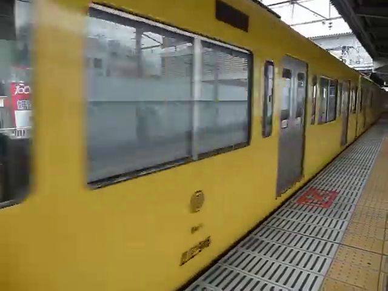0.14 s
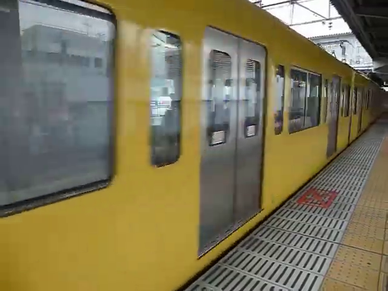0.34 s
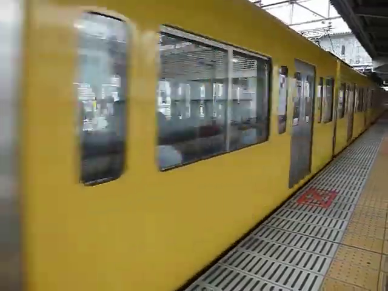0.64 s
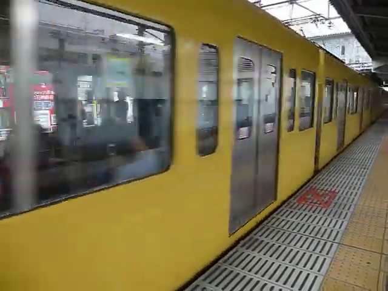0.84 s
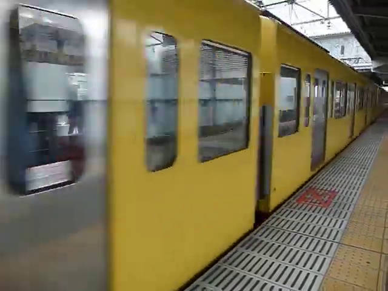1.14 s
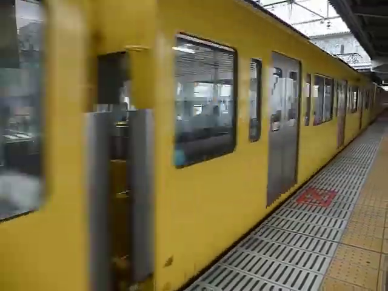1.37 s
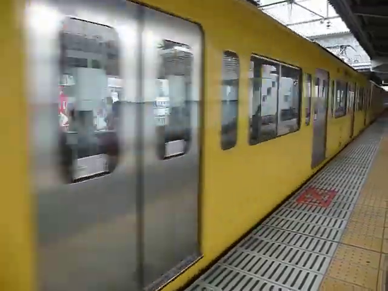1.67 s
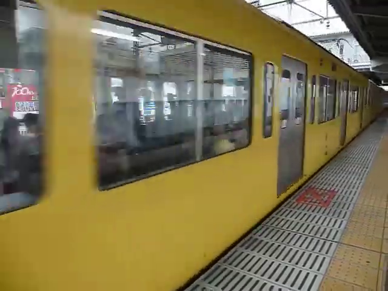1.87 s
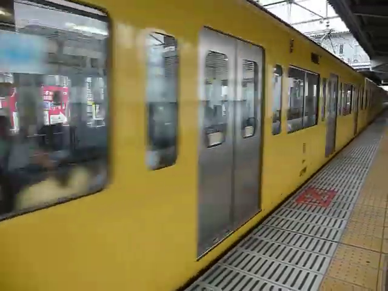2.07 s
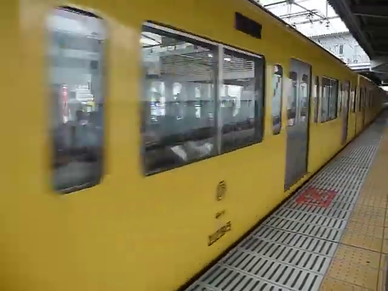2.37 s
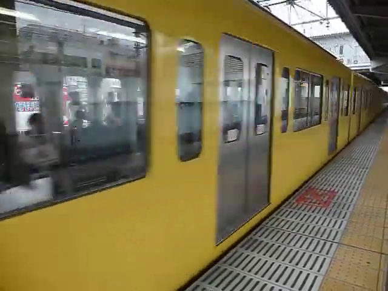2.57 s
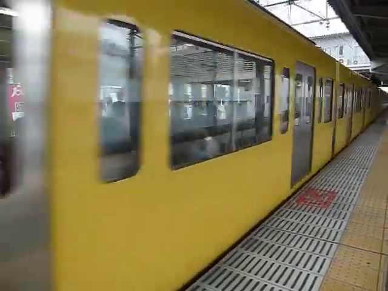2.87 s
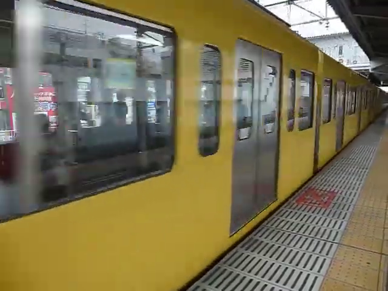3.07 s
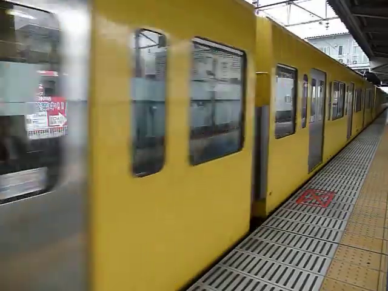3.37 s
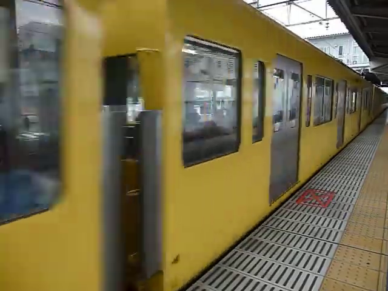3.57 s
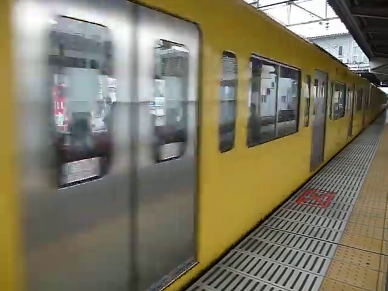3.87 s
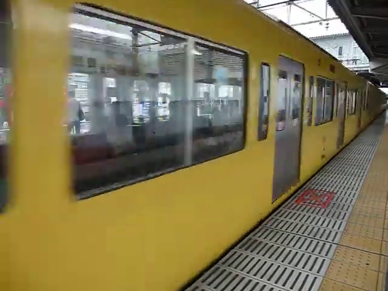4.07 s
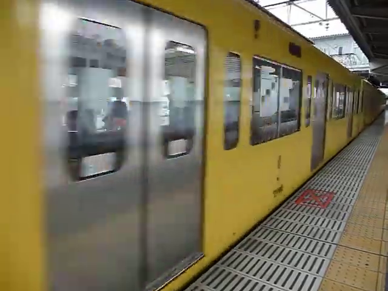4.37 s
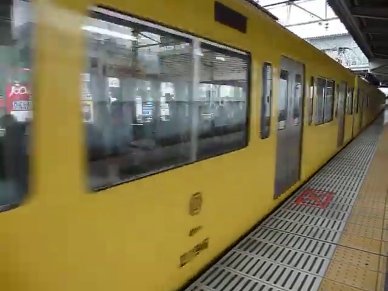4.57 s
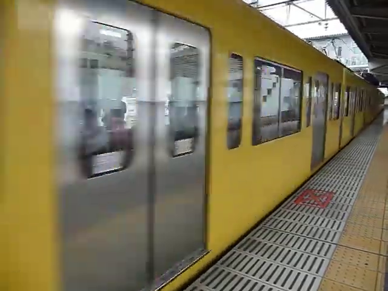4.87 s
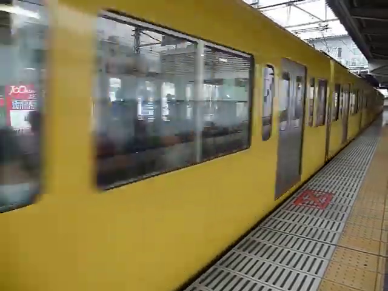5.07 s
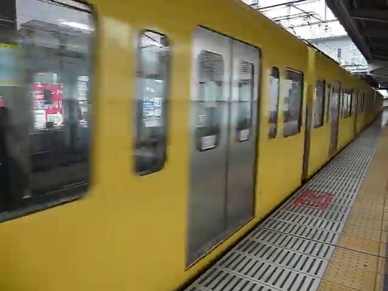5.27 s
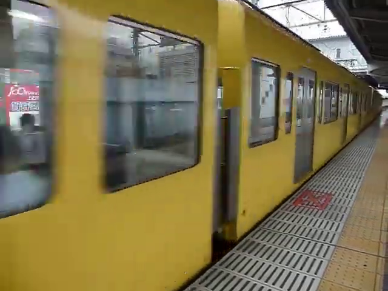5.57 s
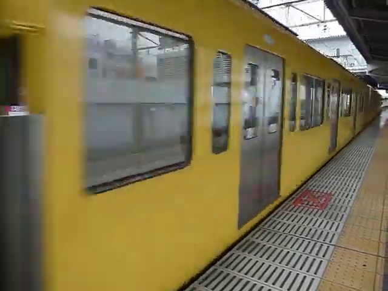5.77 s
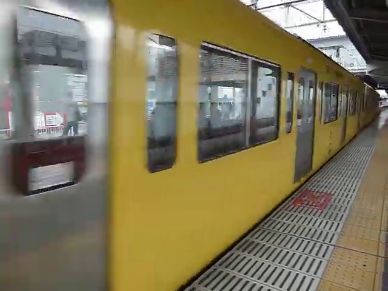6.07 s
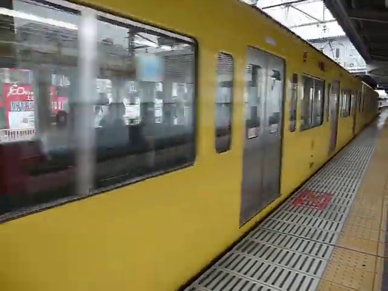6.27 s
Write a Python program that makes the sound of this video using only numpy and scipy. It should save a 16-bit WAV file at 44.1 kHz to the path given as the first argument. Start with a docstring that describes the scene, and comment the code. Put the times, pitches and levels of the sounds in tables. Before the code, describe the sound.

An electric commuter train gathers speed close past a roofed platform, motors humming unsteadily and gears whining while wheels roar and clack over rail joints.

```python
"""An electric commuter train gathers speed past a small camera on a roofed station platform.
At once a jet of air hisses out under the car (filtered noise) and the first bogie clacks over a joint.
Then motors hum and gears whine (wavering tones in beating pairs), climbing slowly in pitch, wheels roar,
steel rings, sings or scrapes (coloured noise), and joints clack or thud (noise bursts, short rings).
After about five seconds hum and whine sink away, leaving roar, draught and the last joints."""
import sys
import numpy as np
from scipy import signal
from scipy.fft import rfft, irfft
from scipy.io import wavfile
from scipy.ndimage import uniform_filter1d

SR = 44100
rng = np.random.default_rng(int(sys.argv[2]) if len(sys.argv) > 2 else 0)


def master_out(mix):
    """Clip the mix to full scale and print it as 16-bit PCM to the path in sys.argv[1]."""
    frames = np.transpose(np.atleast_2d(mix))
    ceiling = np.clip(frames, -1, 1)
    pcm = np.round(ceiling * 32767).astype(np.int16)
    wavfile.write(sys.argv[1], SR, pcm)


N = 284004
TIME = np.arange(N) / SR
FREQS = np.fft.rfftfreq(N, 1 / SR)

# how alike the two microphone ports hear a sound: [f/Hz, likeness 0 to 1]
PORT_LIKENESS = [(30, .6), (70, 1), (130, 1), (260, 1), (500, 1), (1000, 0.96), (1900, 0.92), (3600, 0.8),
                 (7000, 0.86)]
# phase by which the left port leads the right: [f/Hz, lead/rad]
PORT_LEAD = [(100, 0.048), (400, 0.11), (1000, 0.28), (2000, 0.84), (4000, 1), (7200, 0.46)]
# resonances of wheels and rail: [f/Hz, width/Hz, lift/dB]
STEEL_MODES = [(790, 220, 1.5), (940, 93, 0.5), (1830, 29, 4.5), (2070, 220, 4), (2353, 220, 6),
               (2770, 57, -4.5), (3005, 80, 3.5), (3910, 220, 1.5), (4700, 500, 1.5)]


def amp(db):
    """Decibels to gain."""
    return 10 ** (np.asarray(db) / 20)


def unit(x):
    """Scales to rms 1."""
    return x / np.sqrt(np.mean(abs(x) ** 2) + 1e-20)


def add(mix, s, sound):
    """Mixes a sound in at time s, cut off at the end of the mix."""
    part = mix[..., round(s * SR):][..., :sound.shape[-1]]
    part += sound[..., :part.shape[-1]]


def curve(rows, axis=1):
    """One column of a time table, interpolated at every sample."""
    rows = np.array(rows)
    return np.interp(TIME, rows[:, 0], rows[:, axis])


def read(points, hz):
    """A frequency table interpolated on a log-frequency axis."""
    f, value = np.transpose(points)
    return np.interp(np.log(hz + 1), np.log(f + 1), value)


def drift(rate_hz):
    """Smooth chance movement of rms 1, no faster than about rate_hz."""
    slow = rfft(rng.standard_normal(N)) * np.exp(-(FREQS / rate_hz) ** 2)
    return unit(irfft(slow, N))


def steadied(x, window_s):
    """Evens out the chance lumps of a sound, so that its strength is that of the force driving it."""
    size = int(window_s * SR)
    power = uniform_filter1d((x ** 2).mean(0), size=size)
    power = uniform_filter1d(power, size=size)
    return unit(x / np.sqrt(abs(power) + 1e-9))


def noise(colour, lift_db=0):
    """Coloured noise at the two ports, which agree less at some pitches and hear it out of phase."""
    a, b = rfft(rng.standard_normal((2, N)))
    same = np.clip(read(PORT_LIKENESS, FREQS), 0, 1)
    right = same * a + np.sqrt(1 - same ** 2) * b
    right = right * np.exp(-1j * read(PORT_LEAD, FREQS))
    spectrum = np.array([a, right]) * amp(read(colour, FREQS) + lift_db)
    return unit(irfft(spectrum, N))


def tone(hz, scatter, spread_hz):
    """A direct line plus its Doppler-smeared reflections, which differ a little between the ports."""
    near, apart = (unit(drift(spread_hz) + 1j * drift(spread_hz)) for _ in range(2))
    same = np.clip(read(PORT_LIKENESS, hz.mean()), 0, 1)
    echoes = np.array([near, same * near + np.sqrt(1 - same ** 2) * apart])
    phase = 2 * np.pi * (np.cumsum(hz) / SR + rng.random())
    phases = np.array([phase, phase - read(PORT_LEAD, hz)])
    return unit(((1 + scatter * echoes) * np.exp(1j * phases)).real)


def steel():
    """The lift in dB that ringing wheels and rail give each frequency."""
    return sum(db / (1 + (2 * (FREQS - hz) / width) ** 2) for hz, width, db in STEEL_MODES)


def draught():
    """Air dragged along by the train buffets each port on its own, as low unrelated noise."""
    # spectrum of the eddies: [f/Hz, relative level/dB]
    eddy_colour = [(15, -32), (35, -8.5), (65, 4), (110, 7), (170, 0.5), (260, -11.5), (500, -28.5)]
    # strength of the draught: [t/s, level/dB]
    strength = [(0, -58.5), (1, -44), (2.3, -42), (3.2, -43), (4.8, -55), (6.44, -42)]
    eddies = irfft(rfft(rng.standard_normal((2, N))) * amp(read(eddy_colour, FREQS)), N)
    return amp(curve(strength) + 3.4 * drift(7.8)) * unit(eddies)


def air_jet():
    """Compressed air hisses briefly under the car: the valve opens, holds and shuts."""
    # the jet: [start t/s, length/s from start to shutting, level/dB]
    jet = (-.02, 0.31, -42)
    # spectrum of the jet: [f/Hz, relative level/dB]
    jet_colour = [(1500, -12), (3500, -10), (5500, 1), (7000, -3), (7700, -13)]
    rise_s, t60_s = 0.069, 0.25
    start, length, db = jet
    opening = np.clip((TIME - start) / rise_s, 0, 1)
    shut = np.maximum(TIME - start - length, 0)
    dying = np.exp(-np.log(1000) * shut / t60_s)
    return amp(db) * opening * dying * noise(jet_colour)


def rolling():
    """Rough wheel treads shake car bodies, rails and wheels; one unevenness moves roar and hiss."""
    # level of the rolling noise: [t/s, rumble/dB, roar/dB, hiss/dB]
    levels = [(0, -26, -24, -34), (.8, -23.5, -24.5, -37), (1.05, -27, -25, -38), (1.3, -23.5, -24.5, -38),
              (1.55, -28.5, -25, -37), (1.85, -31, -24.5, -37.5), (2.05, -29.5, -25, -37),
              (2.18, -24, -22, -35), (2.36, -22.5, -23.5, -34.5), (2.6, -25, -26, -37.5),
              (3.3, -27.5, -23, -34.5), (3.95, -28.5, -23.5, -35), (4.3, -25.5, -22.5, -35),
              (4.52, -27, -24, -36.5), (5.2, -25, -21.5, -35), (5.7, -28, -24, -37),
              (5.88, -23.5, -21, -35), (6.18, -28, -23.5, -35.5), (6.44, -25, -21.5, -34)]
    # spectra from low to high: [f/Hz, relative level/dB]
    rumble_colour = [(20, -29), (40, -13), (70, -12), (100, -7.5), (160, -1), (230, 0), (300, 4.5),
                     (420, -31.5), (800, -49)]
    roar_colour = [(150, -30.5), (280, -1), (360, 2.5), (470, -0.5), (660, -10.5), (900, -11),
                   (1120, -13.5), (1320, -20.5), (1700, -24.5), (2600, -45)]
    hiss_colour = [(700, -26.5), (1400, 8), (2100, 5.5), (2750, 5), (3500, 2.5), (4800, -0.5), (6100, -3),
                   (7000, -7.5), (7700, -44.5)]
    uneven = drift(8.9)
    rumble = amp(curve(levels) + 1.5 * drift(5.0)) * noise(rumble_colour)
    roar = amp(curve(levels, axis=2) + 1.2 * uneven) * noise(roar_colour, steel())
    hiss = amp(curve(levels, axis=3) + 0.49 * uneven) * noise(hiss_colour, steel())
    return rumble + roar + hiss


def high_steel():
    """High steel sounds: wheels ring after joint blows, and flanges sing or scrape between them."""
    # swells of band-filtered noise, singing when narrow and scraping when wide:
    # [middle t/s, half length/s, centre f/Hz, width/Hz of one filter pass, level/dB]
    swells = [(.2, 0.064, 2410, 450, -37), (0.434, 0.082, 2360, 700, -38.5), (0.886, 0.032, 3290, 600, -36),
              (2.45, .03, 2540, 260, -40.5), (2.71, .05, 2380, 500, -41), (3.39, 0.043, 3600, 4000, -38),
              (4.096, 0.19, 3000, 200, -46), (4.621, .044, 2290, 300, -32), (5.264, 0.022, 2330, 260, -35),
              (5.527, .05, 1780, 90, -38), (5.868, .04, 2360, 170, -41), (6.265, 0.026, 2870, 91, -42.5),
              (6.312, .075, 3000, 65.4, -45)]
    excitation = noise([(100, 0), (8000, 0)])  # flat spectrum
    out = np.zeros((2, N))
    for s, half, hz, width, db in swells:
        near = abs(TIME - s) < 2 * half
        mode = signal.iirpeak(hz, hz / width, fs=SR)
        band = signal.lfilter(*mode, excitation[:, near])
        band = signal.lfilter(*mode, band)
        swell = np.exp(-((TIME[near] - s) / half) ** 2)
        out[:, near] += amp(db) * swell * unit(band)
    return out


def blow(rise, t60, hold=0):
    """Envelope of one blow: it builds up under the car, holds, and dies away along the platform."""
    age = TIME[:SR]
    dying = np.exp(-np.log(1000) * np.maximum(age - rise - hold, 0) / t60)
    return np.minimum(age / rise, 1) * dying


def ring(hz, rise, t60):
    """A short, pitched ring under the envelope of a blow, reaching the ports out of phase."""
    half_second = SR // 2
    phase = 2 * np.pi * (hz * TIME[:half_second] + rng.random())
    pitched = np.cos([phase, phase - read(PORT_LEAD, hz)])
    return np.sqrt(2) * blow(rise, t60)[:half_second] * pitched


def wheel_ring(rise):
    """The steel modes ring on after a blow; every wheel has its own tuning and mix of them."""
    slope_db, t60_s = -6.5, .25  # slope: per octave above the lowest mode
    out = 0
    chances = rng.random((len(STEEL_MODES), 2))
    for (hz, width, _), (detune, strength) in zip(STEEL_MODES, chances):
        octaves = np.log2(hz / STEEL_MODES[0][0])
        gain = strength * amp(slope_db * octaves)
        out = out + gain * ring(hz + width * (detune - .5), rise, t60_s)
    return out


def joints():
    """Each wheel drops on the rail end: the rail clangs and cracks, the bogie thuds, loose steel sizzles."""
    # axles crossing a joint, in pairs by bogie: [t/s, rise/s, t60/s, thud/dB, clang/dB, sizzle/dB,
    # crack/dB, ring f/Hz, ring/dB]; rise and t60 are those of the clang
    axles = [(.125, 0.024, 0.38, -18, -23.5, -30, -25, 610, -28),
             (.392, 0.0077, .36, -17, -23, -33.5, -38, 920, -24),
             (.86, .012, 0.25, -21, -22.5, -30.5, -27, 630, -24),
             (1.117, 0.017, .28, -20.5, -26, -31, -35, 915, -30),
             (1.456, .011, .11, -13.5, -27.5, -44.5, -45.5, 470, -19),
             (1.698, 0.022, .13, -10.5, -28.5, -41, -48, 451, -20.5),
             (2.423, 0.0057, 0.37, -21, -22.5, -34.5, -33, 780, -24),
             (2.658, 0.02, 0.23, -13.5, -24, -31, -36, 1359, -32),
             (3.101, 0.013, .2, -18.5, -23.5, -33.5, -22, 1148, -27.5),
             (3.342, 0.014, 0.28, -20, -22, -31.5, -34, 458, -20),
             (3.664, 0.0089, 0.29, -14.5, -26, -36, -33, 522, -30),
             (3.903, 0.0092, 0.086, -16.5, -25, -38.5, -38, 531, -16.5),
             (4.574, 0.028, 0.21, -18, -18, -30, -36, 801, -20.5),
             (4.819, .01, .22, -14.5, -22.5, -31, -32, 810, -21),
             (5.241, .013, 0.27, -16, -20, -29, -23.5, 405, -17),
             (5.477, .0037, 0.44, -17, -22.5, -31, -33, 818, -18),
             (5.796, 0.0031, 0.29, -20, -27, -34.5, -37, 517, -17),
             (6.026, .0021, 0.14, -16.5, -27.5, -45, -37, 542, -18.5)]
    # further low knocks: late thuds of axle blows, a hum onset at 3.0 s, and single knocks:
    # [t/s, rise/s, thud/dB, ring f/Hz, ring/dB]
    low_knocks = [(.2, 0.0093, -32, 375, -26), (.957, .006, -32, 720, -28), (1.3, .017, -21.5, 408, -30),
                  (2.443, .006, -17.5, 400, -17.5), (3.0, 0.0022, -18, 390, -16),
                  (3.37, .014, -27, 621, -21), (3.553, 0.0092, -36, 790, -23),
                  (3.985, .008, -26, 426.2, -18), (5.129, 0.019, -20, 363.4, -18),
                  (5.88, 0.021, -30, 357, -17.5), (6.064, 0.029, -22.5, 360, -16.5),
                  (6.41, .017, -28, 419, -22)]
    # spectra of the parts of a blow: [f/Hz, relative level/dB]
    thud_colour = [(30, -31), (70, -11), (130, 1.5), (210, 6), (300, 3.5), (450, -1), (650, -16.5),
                   (1300, -45)]
    clang_colour = [(200, -15.5), (420, 7.5), (620, 8), (850, 9), (1100, 6), (1400, -4), (1900, -24.5),
                    (3000, -53.5)]
    sizzle_colour = [(900, 4), (1800, 5.5), (2400, 2.5), (3300, 0), (4800, 0), (6200, -5.5), (7000, -5.5),
                     (7700, -24.5)]
    crack_colour = [(400, -9), (1100, 10), (1600, -2), (2300, 8.5), (3500, -3.5), (5500, -11), (7700, -27)]
    thud_lag_s, thud_rise_s, thud_t60_s = 0.0055, 0.017, 0.19  # the heavy bogie answers late
    crack_rise_s, crack_t60_s = 0.0021, 0.032
    ring_t60_s, knock_t60_s = 0.051, .1
    settle_s = 0.0089  # the wheel chatters on the rail end before it settles
    wheel_ring_db = 2.5  # lowest steel mode over the sizzle, at full chance strength
    chatter_db = 1.5  # roughness of rattling steel

    thud, clang, sizzle, crack = np.zeros((4, N))
    rings = np.zeros((2, N))
    for s, rise, t60, thud_db, clang_db, sizzle_db, crack_db, ring_hz, ring_db in axles:
        add(thud, s + thud_lag_s, amp(thud_db) * blow(thud_rise_s, thud_t60_s))
        add(clang, s, amp(clang_db) * blow(rise, t60, settle_s))
        add(sizzle, s, amp(sizzle_db) * blow(1.4 * rise, 2.1 * t60, settle_s))
        # the crack comes as the wheel lands, at the top of the clang
        add(crack, s + rise, amp(crack_db) * blow(crack_rise_s, crack_t60_s))
        add(rings, s, amp(ring_db) * ring(ring_hz, rise, ring_t60_s))
        add(rings, s, amp(sizzle_db + wheel_ring_db) * wheel_ring(rise))
    for s, rise, thud_db, ring_hz, ring_db in low_knocks:
        add(thud, s, amp(thud_db) * blow(rise, thud_t60_s))
        add(rings, s, amp(ring_db) * ring(ring_hz, rise, knock_t60_s))

    chatter = unit(amp(chatter_db * drift(120)))
    lift = steel()
    rattle = clang * steadied(noise(clang_colour, lift), window_s=.012)
    rattle = rattle + sizzle * noise(sizzle_colour, lift)
    thuds = thud * steadied(noise(thud_colour), window_s=0.022)
    cracks = crack * noise(crack_colour, lift)
    return thuds + chatter * rattle + cracks + rings


def car_level(axis):
    """Level in dB of one weaker tone of whichever part of the train is passing."""
    # each stretch of the train has its own mix:
    # [t/s its front passes, octave of the hum/dB, half the gear pitch/dB, fan tone/dB]
    stretches = np.array([(0, -40, -35.5, -45), (1.25, -31, -39.5, -33.5), (2.48, -34.5, -46, -41.5),
                          (3.4, -40.5, -34.5, -41), (5.3, -43, -50, -46)])
    handover_s = .4
    passing = np.searchsorted(stretches[1:, 0], TIME)
    return uniform_filter1d(stretches[passing, axis], size=int(handover_s * SR))


def passing_pair(coming, going, axis):
    """Blends an approaching and a receding source at constant power."""
    # how far the approaching unit outweighs the receding one: [t/s, motor/dB, gearbox/dB]
    balance = [(0, 7.5, 9.5), (.4, 2, -0.5), (.6, 13, -3), (.85, 12, 10), (1.2, -1, 1), (1.65, 9.5, -0.5),
               (1.95, -11, -9.5), (2.35, -17.5, -5), (2.9, -6.5, 1), (3.05, 5.5, 0), (3.3, 4, -4),
               (3.7, 4.5, -5), (4.3, 7.5, 3), (4.8, 1, -8), (5.05, 2, 5.5), (5.3, 4, -9)]
    weight = amp(curve(balance, axis=axis))
    return (weight * coming + going) / np.sqrt(1 + weight ** 2)


def gears():
    """Two gearboxes whine a little above and below the true tooth pitch, and growl an octave lower."""
    # pitch of the gear teeth, mostly climbing with the speed: [t/s, f/Hz]
    tooth_pitch = [(0, 1447), (.7, 1481), (1.2, 1500), (1.9, 1527), (2.3, 1537), (2.9, 1564), (3.3, 1577),
                   (4.2, 1568), (4.8, 1582), (5.3, 1595)]
    # level of the whine: [t/s, level/dB]
    whine_level = [(0, -33), (.04, -27.5), (.22, -37), (.28, -30), (.33, -34.5), (.39, -27.5), (.45, -39),
                   (.53, -30.5), (.68, -28.5), (.73, -34.5), (.8, -26.5), (.87, -27), (.91, -35),
                   (.97, -36), (1.01, -25.5), (1.06, -33), (1.3, -33.5), (1.37, -38.5), (1.61, -33.5),
                   (1.78, -40.5), (1.94, -32), (2.08, -43), (2.22, -35), (2.48, -42), (2.92, -36.5),
                   (3.45, -42.5), (3.62, -37.5), (3.8, -37.5), (3.94, -42), (4.27, -34), (4.35, -43),
                   (4.87, -45), (4.94, -43), (5.0, -43), (5.05, -36), (5.11, -48), (5.18, -38), (5.25, -39),
                   (5.45, -53)]
    doppler = .015  # shift of an approaching or receding gearbox (share of the pitch)
    fading_db = 3  # depth of the whine's chance swells
    high_hz = curve(tooth_pitch) * (1 + doppler + 0.001515 * drift(6))
    low_hz = curve(tooth_pitch) * (1 - doppler + .0015 * drift(5.7))
    whine_coming = tone(high_hz, scatter=1.0, spread_hz=27)
    whine_going = tone(low_hz, scatter=0.97, spread_hz=49)
    whine = passing_pair(whine_coming, whine_going, axis=2)
    growl_coming = tone(high_hz / 2, scatter=1.5, spread_hz=30)
    growl_going = tone(low_hz / 2, scatter=1.0, spread_hz=28)
    growl = passing_pair(growl_coming, growl_going, axis=1)
    swell = amp(curve(whine_level) + fading_db * np.tanh(drift(20)))
    return swell * steadied(whine, window_s=0.065) + amp(car_level(axis=2)) * growl


def motors():
    """Approaching and receding motors beat against each other; weaker tones follow the same speed."""
    # motor speed, as the pitch of its hum: [t/s, f/Hz]
    hum_pitch = [(0, 282.8), (.7, 289.3), (1.4, 291.3), (2.3, 295.5), (3, 302.5), (3.8, 302.8), (4.5, 305),
                 (5.1, 309.9), (6.44, 321.6)]
    # the hum swells and drops as motors beat and echoes interfere, and sinks after five seconds:
    # [t/s, level/dB]
    hum_level = [(0, -17.5), (.28, -32), (.32, -10.5), (.365, -19), (.41, -14.5), (.44, -16), (.49, -40),
                 (.56, -30), (.59, -14.5), (.635, -20), (.68, -14), (.73, -18), (.82, -24), (.88, -15),
                 (.93, -23), (.99, -9.5), (1.26, -18), (1.31, -26.5), (1.38, -16), (1.46, -21), (1.52, -13),
                 (1.61, -30), (1.73, -19), (1.77, -11), (1.95, -21), (2.15, -21), (2.23, -11),
                 (2.41, -16.5), (2.47, -35), (2.55, -23), (2.63, -19), (2.7, -29.5), (2.93, -16),
                 (2.98, -28), (3.02, -15), (3.19, -30), (3.26, -17.5), (3.38, -33.5), (3.43, -13),
                 (3.52, -27), (3.78, -20.5), (3.83, -20.5), (3.99, -15.5), (4.14, -31.5), (4.29, -17.5),
                 (4.52, -18.5), (4.6, -26), (4.78, -19.5), (4.81, -22.5), (4.87, -18), (4.92, -25),
                 (4.97, -16.5), (5.08, -18), (5.22, -40.5), (6.44, -42)]
    doppler = .025  # a receding motor is flatter (share of the pitch)
    fading_db = 1  # depth of the hum's chance swells and drops
    fan_order = 1.645  # fan pitch over hum pitch
    drone_db = -41.5
    hz = curve(hum_pitch)
    coming = tone(hz * (1.001 + 0.0068 * drift(8.0)), scatter=0.23, spread_hz=23)
    going = tone(hz * (1 - doppler + 0.00907 * drift(6.96)), scatter=0.51, spread_hz=18)
    swell = amp(curve(hum_level) + fading_db * np.tanh(drift(17)))
    hum = swell * steadied(passing_pair(coming, going, axis=1), window_s=0.079)
    octave = amp(car_level(axis=1)) * tone(1.975 * hz, scatter=1.1, spread_hz=27)
    fan = amp(car_level(axis=3)) * tone(fan_order * hz, scatter=0.28, spread_hz=14)
    drone = amp(drone_db) * tone(hz / 4, scatter=3.2, spread_hz=9.9)  # shaft, two octaves down
    return hum + octave + fan + drone


def scene():
    """The whole train at the two ports, each with its own slight colour, plus the draught."""
    # tilt between the ports: [f/Hz, left minus right/dB]
    tilt = [(300, 0.54), (2400, 0.5), (4200, 0), (7000, -1)]
    train = motors() + gears() + air_jet() + rolling() + joints() + high_steel()
    port_gain = amp(np.outer([.5, -.5], read(tilt, FREQS)))
    return irfft(rfft(train) * port_gain, N) + draught()


def record(dry):
    """The small camera's gain control ducks the loudest swells; then its narrow band limit."""
    edge_hz, threshold_db = 7720, -15
    power = uniform_filter1d((dry ** 2).mean(0), size=600)
    power_db = 10 * np.log10(abs(power) + 1e-12)
    # the held peak falls back at 28 dB per second
    recovery_db = 28 * TIME
    held_db = np.maximum.accumulate(power_db + recovery_db) - recovery_db
    over_db = np.maximum(held_db - threshold_db, 0)
    ducked = dry * amp(-0.86 - 0.45 * uniform_filter1d(over_db, size=400))
    taps = signal.firwin(301, edge_hz, window=("kaiser", 8), fs=SR)
    return signal.oaconvolve(ducked, taps[None], "same")


dry = scene()
out = record(dry)
master_out(out)
```